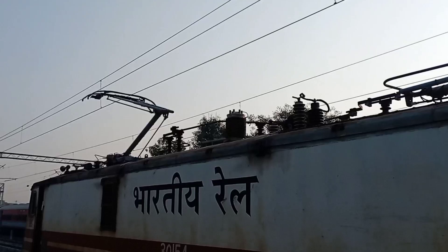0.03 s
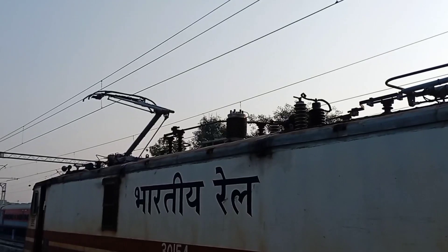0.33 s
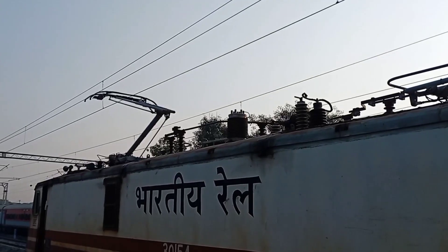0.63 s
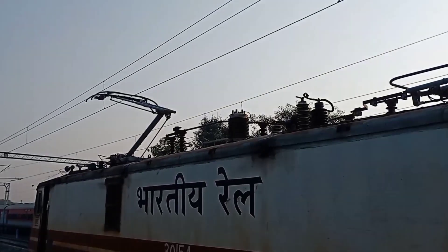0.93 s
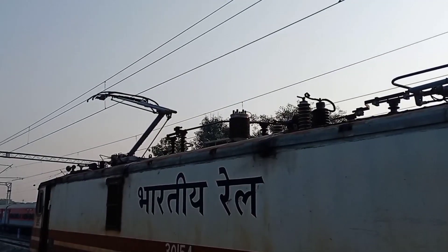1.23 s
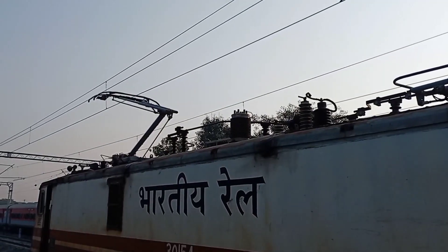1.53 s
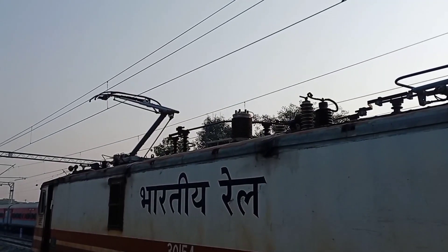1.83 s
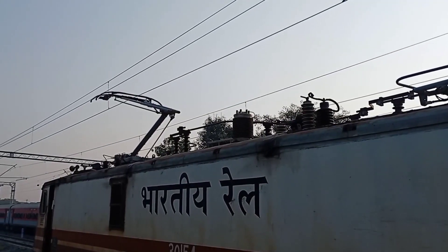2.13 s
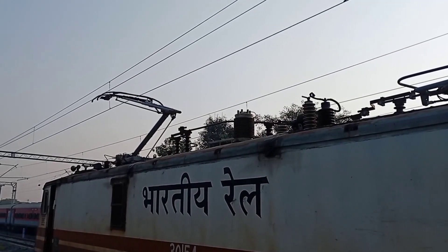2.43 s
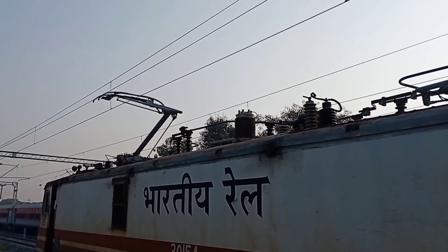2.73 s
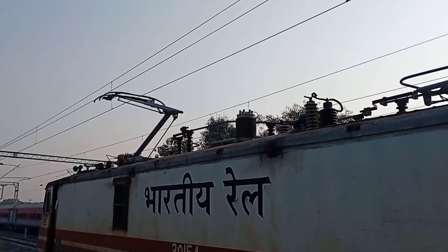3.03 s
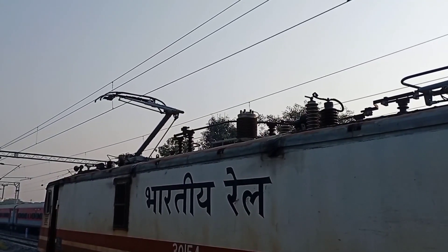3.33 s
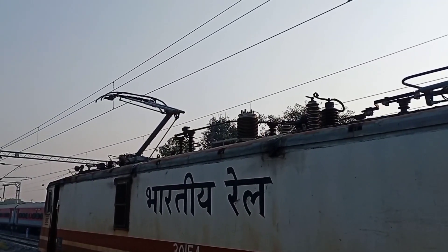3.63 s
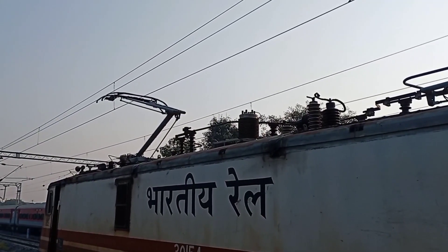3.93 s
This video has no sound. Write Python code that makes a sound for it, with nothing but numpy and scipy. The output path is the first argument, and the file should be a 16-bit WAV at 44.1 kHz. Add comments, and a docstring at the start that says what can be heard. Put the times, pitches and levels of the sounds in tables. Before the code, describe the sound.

A large cooling fan slows inside a parked electric locomotive, heard close by outdoors. The hum drops in pitch and the hollow boom of air eases. A low rumble continues as faint, hissing metallic friction gradually emerges.

```python
"""On a station platform, beside a standing electric locomotive whose cooling blower coasts down.
The nine blades hum ever lower; air booms in the ducts and rushes through the grilles, fading with the
speed, over the steady rumble of the machine room. As the blower slows, a dry rubbing, perhaps a bearing
or a brush, sets thin metal ringing. The sound fades in at the start."""
import sys
import numpy as np
from scipy import signal
from scipy.fft import rfft, irfft
from scipy.io import wavfile

SR = 44100
rng = np.random.default_rng(int(sys.argv[2]) if len(sys.argv) > 2 else 0)


def file_out(sig):
    """Save sig as 16-bit WAV at sys.argv[1]."""
    # one column per channel
    cols = np.atleast_2d(sig).T
    # limit, then scale
    lim = np.clip(cols, -1, 1)
    pcm = np.round(lim * 32767).astype(np.int16)
    wavfile.write(sys.argv[1], SR, pcm)


N = 176400

# stereo image of the noise, solid in the bass and wide on top: f/Hz, channel correlation
LIKENESS = [(60, 1), (250, 1), (500, 0.98), (900, 0.98), (1400, 0.26), (2000, 0.086), (3000, 0.16),
            (6000, 0.038)]
# panning of air and rumble: f/Hz, left minus right/dB
AIR_PAN = [(100, 0), (380, -1), (1280, -.5), (2400, 1), (4300, 1.8), (7000, -2), (9000, 5.5), (11500, 5.5),
           (13000, 1)]


def undb(db):
    """Decibels to gain."""
    return 10 ** (np.asarray(db) / 20)


def curve(rows):
    """An envelope of straight lines through rows of t/s, value."""
    return np.interp(np.arange(N) / SR, *np.array(rows).T)


def bin_hz():
    """The frequencies of a whole-length spectrum."""
    return np.maximum(np.arange(N // 2 + 1) * SR / N, 1)


def across(rows):
    """Rows of f/Hz, value joined on a log-frequency axis."""
    hz, value = np.array(rows).T
    return np.interp(np.log(bin_hz()), np.log(hz), value)


def waver(rate_hz):
    """Random modulation of rms 1, mostly slower than rate_hz."""
    drift = irfft(rfft(rng.standard_normal(N)) / (1 + (bin_hz() / rate_hz) ** 4), N)
    return (drift - drift.mean()) / drift.std()


def stereo_noise(colour, pan_db, likeness):
    """Noise of rms 1 with a given colour, panning and channel correlation."""
    mid, side = rfft(rng.standard_normal((2, N)))
    alike = np.clip(likeness, -.999, .999)
    ears = np.array([[1], [-1]])
    spectrum = np.sqrt(1 + alike) * mid + ears * np.sqrt(1 - alike) * side
    noise = irfft(colour * spectrum * undb(ears * pan_db / 2), N)
    return noise / noise.std()


def noise_bed(eq, pan):
    """Broad stereo noise shaped by an EQ table and a panning table."""
    return stereo_noise(undb(across(eq)), across(pan), across(LIKENESS))


def room_rumble():
    """The machine room lays a steady rumble under everything."""
    # colour of the rumble: f/Hz, level/dB
    rumble_eq = [(20, -34), (45, -23), (58, -9.5), (70, -0.5), (100, -4), (160, -7), (400, -16),
                 (1050, -15.5), (1400, -24.5), (3000, -43)]
    return noise_bed(rumble_eq, AIR_PAN) * undb(-32)


def rubbing():
    """Uneven friction hisses and keeps narrow metal modes ringing, each register with its own swell."""
    # colour of the friction hiss: f/Hz, level/dB
    hiss_eq = [(1000, -3), (2500, -8), (4500, -13.5), (6000, -7), (7200, -9), (8800, -8), (9700, 2.5),
               (10600, -0.5), (10950, -5), (11500, -0.5), (12100, -12), (13000, -12), (14800, -10),
               (15500, -19)]
    # panning of the hiss: f/Hz, left minus right/dB
    hiss_pan = [(2000, 1), (7000, 0.92), (9000, 9.3), (11000, 6.7), (13000, 2)]
    # modes of the rubbed metal: f/Hz, width/Hz, level/dB, left minus right/dB
    metal_modes = [(1500, 28, -48, 0), (1635, 24, -47.5, 0), (1790, 42, -48, 0), (1945, 40, -54, 0),
                   (2515, 30, -44.5, 2), (2580, 50, -47, 2), (2665, 22, -44.5, 2), (2870, 60, -55, 2),
                   (4347, 38, -51.5, 2), (4630, 60, -57.5, 2), (7550, 34, -52, -2), (7950, 40, -52.5, 2),
                   (8200, 55, -52, 4), (8570, 55, -49.5, 6), (8915, 50, -48, 6), (9320, 48, -43, 11),
                   (9470, 38, -44.5, 11), (9705, 20, -51.5, 5), (10072, 36, -47, 4), (10702, 36, -51.5, 8),
                   (11514, 32, -51, 3)]
    # swells of the four registers: t/s, level/dB
    low_swell = [(0.3, -0.5), (2.0, -3), (3.0, 2.5), (4.0, 4)]
    whine_swell = [(0.3, 0), (1.3, 0.5), (1.6, -2), (2.2, 0), (2.45, 4), (2.9, 2), (3.28, 5), (3.4, 2),
                   (3.51, 6.5), (3.59, 3.5), (3.75, 7.5), (3.83, 3.5), (3.91, 8.5), (4.0, 2)]  # near 2.6 kHz
    ring_swell = [(0.3, -6), (2.0, -2), (2.7, 5.5), (3.15, 4), (3.4, 7.5), (3.65, 1.5), (3.82, 8),
                  (4.0, 12)]  # near 4.3 kHz
    treble_swell = [(0.2, -16), (1.2, -12), (2.0, -3.5), (2.55, 1.5), (3.2, 1), (4.0, 2.5)]  # top modes and hiss
    # borders between the registers: f/Hz
    register_edges = [2000, 3500, 5000]
    drives = [undb(curve(swell)) for swell in (low_swell, whine_swell, ring_swell, treble_swell)]
    grip = undb(1.2 * waver(24))
    rub = noise_bed(hiss_eq, hiss_pan) * undb(-35) * drives[-1]
    for hz, width, db, pan_db in metal_modes:
        resonance = 1 / (1 + 1j * (bin_hz() - hz) / width) ** 2
        mode = stereo_noise(resonance, pan_db, likeness=0.12)
        drive = drives[np.searchsorted(register_edges, hz)]
        rub += mode * undb(db + waver(5.6)) * drive
    return rub * grip


def grille_rush(blade_hz):
    """Air rushes through the grilles, softer as the fan slows."""
    # colour of the rush: f/Hz, level/dB
    grille_eq = [(600, -6.5), (1300, -0.5), (2000, 0.2), (2900, 1), (3190, 3), (3550, 2.5), (4000, 1.3),
                 (4150, -4.3), (4900, -5.5), (5400, -10.5), (5850, -4), (7000, -6), (8000, -1.5), (8900, 1),
                 (9600, -7), (11500, -9.5), (12500, -11), (13000, -18), (14300, -24), (15500, -41)]
    fall_db_per_octave = 21.5
    octaves_slowed = np.log2(blade_hz.mean() / blade_hz)
    rush_db = -30.5 - fall_db_per_octave * octaves_slowed + 0.57 * waver(26)
    return noise_bed(grille_eq, AIR_PAN) * undb(rush_db)


def duct_boom():
    """Air booms in the ducts and ebbs away unevenly."""
    # colour of the boom: f/Hz, level/dB
    duct_eq = [(20, -54), (35, -42), (52, -28), (70, -18), (88, -13), (115, -16), (140, -10.5), (172, -10),
               (186, -1), (203, -1.5), (238, 0.5), (256, 0), (272, -4), (302, -6), (330, -12.5),
               (420, -17.5), (470, -15), (505, -17.5), (532, -15.5), (570, -21.5), (650, -24.5),
               (685, -16.5), (780, -20), (910, -28.5), (975, -24.5), (1200, -31), (1700, -38),
               (3000, -55.5)]
    # ebb of the boom: t/s, level/dB
    boom_ebb = [(0.3, 3), (0.52, 5), (0.63, 3), (0.82, 5), (0.92, 3.5), (1.25, 3.5), (1.5, 1.7), (2.0, 1.5),
                (2.25, -0.5), (2.75, -0.5), (3.15, -2), (3.4, -1.2), (4.0, -3.5)]
    boom_db = -15 + curve(boom_ebb) + 0.42 * waver(6.9)
    return noise_bed(duct_eq, AIR_PAN) * undb(boom_db)


def fan_hum(blade_hz):
    """Shaft and blade tones sink together, each wavering a little in phase and level."""
    # partials of the fan: multiple of the shaft rate, level/dB
    partials = [(2, -39.5), (7, -28), (9, -28), (18, -44.5), (20, -49), (27, -56)]
    # envelope of the hum: t/s, level/dB
    hum_level = [(0.3, 0.5), (0.85, -5), (1.1, 2), (1.8, 0), (2.7, -1), (3.5, 4.5), (4.0, 2.5)]
    blades = 9
    turns = np.cumsum(blade_hz / blades) / SR
    hum = 0
    for multiple, db in partials:
        phase = 2 * np.pi * (multiple * turns + rng.random()) + 0.39 * waver(4.9)
        hum += np.sqrt(2) * np.sin(phase) * undb(db + 1.5 * waver(6.1))
    return hum * undb(curve(hum_level))


def scene():
    """The coasting fan drives hum and rush; boom, rumble and rubbing join them."""
    # falling blade-passing rate: t/s, f/Hz
    coast = [(0, 421.6), (1, 381.2), (2, 347.7), (3, 318.2), (4, 292.5)]
    blade_hz = curve(coast)
    left, right = fan_hum(blade_hz) + duct_boom() + grille_rush(blade_hz) + room_rumble() + rubbing()
    left_lag_s = 0.0002206  # the low sounds come from the right; the high ringing still leans left
    late_left = irfft(rfft(left) * np.exp(-2j * np.pi * bin_hz() * left_lag_s), N)
    return np.array([late_left, right])


def record(dry):
    """A quick fade-in from silence and a steep high cut."""
    # fade-in: t/s, level/dB
    fade_in = [(0.17, -87), (0.19, -53), (0.203, -28), (0.22, -19), (0.232, -12), (0.27, -5.5), (0.35, -2)]
    top_hz = 15100
    high_cut = signal.ellip(12, .2, 90, top_hz, fs=SR, output="sos")
    return signal.sosfilt(high_cut, dry * undb(curve(fade_in)))


dry = scene()
out = record(dry)
file_out(out)
```